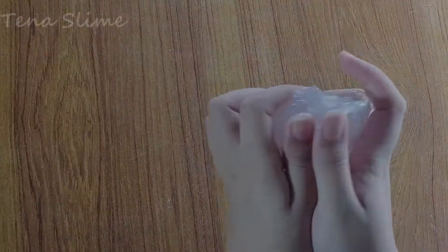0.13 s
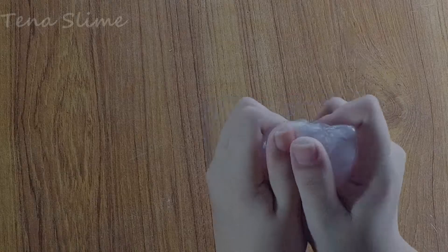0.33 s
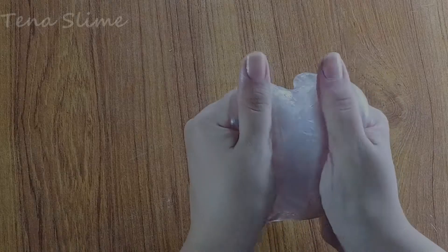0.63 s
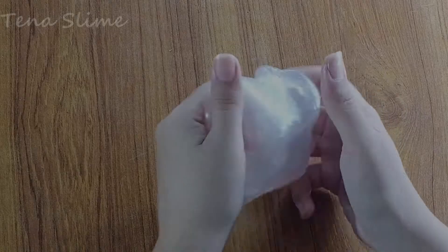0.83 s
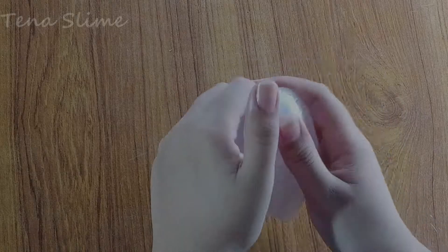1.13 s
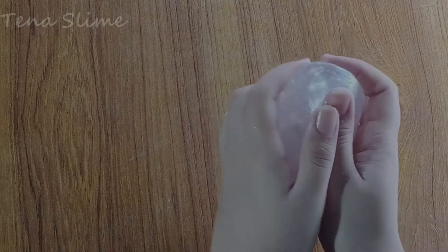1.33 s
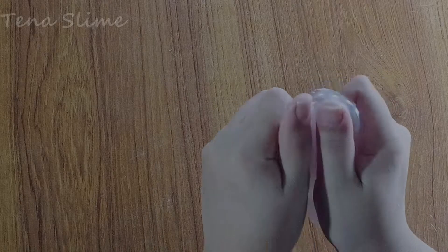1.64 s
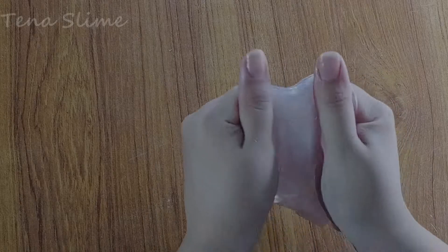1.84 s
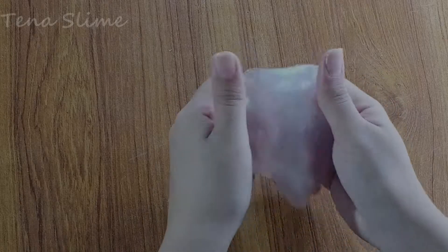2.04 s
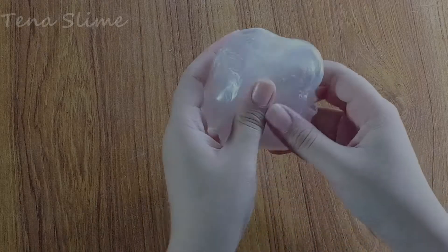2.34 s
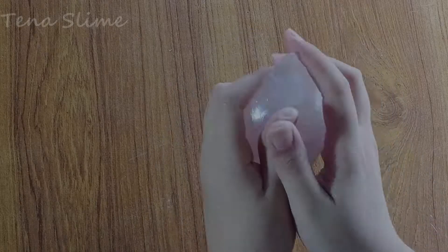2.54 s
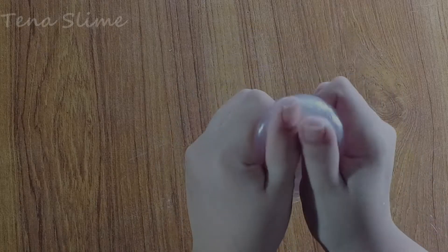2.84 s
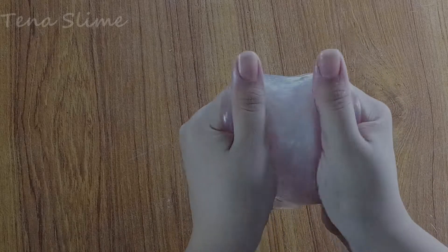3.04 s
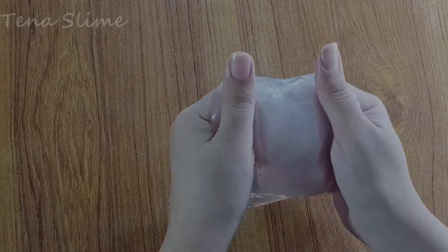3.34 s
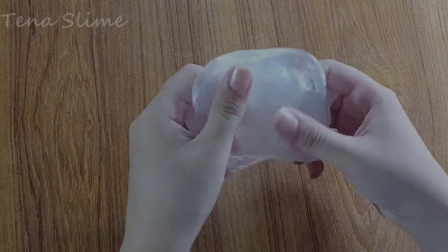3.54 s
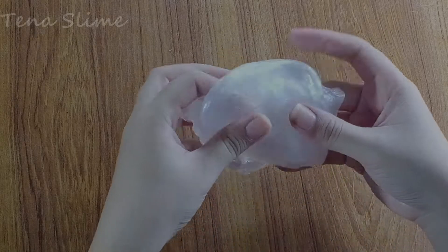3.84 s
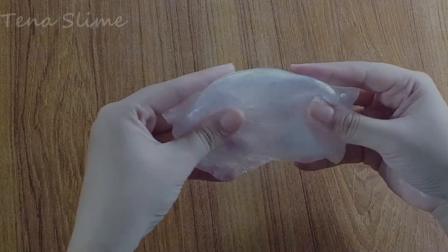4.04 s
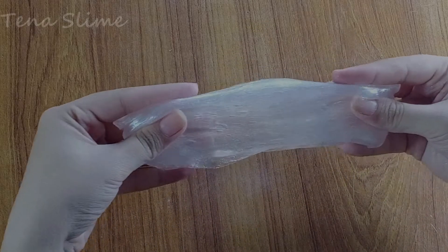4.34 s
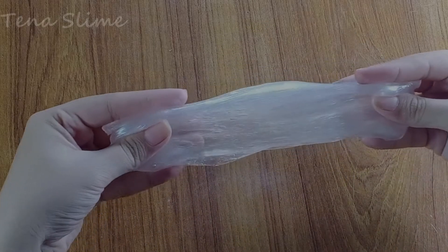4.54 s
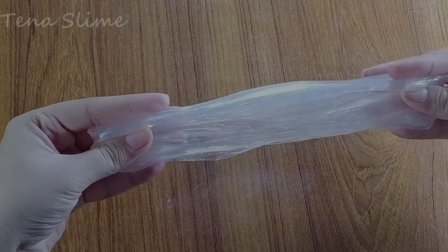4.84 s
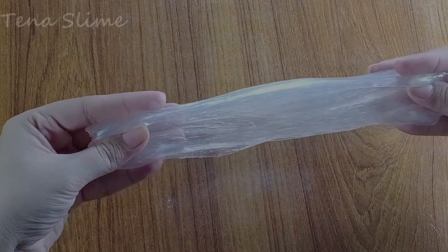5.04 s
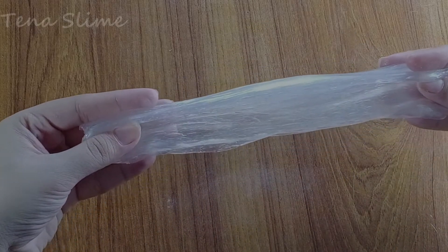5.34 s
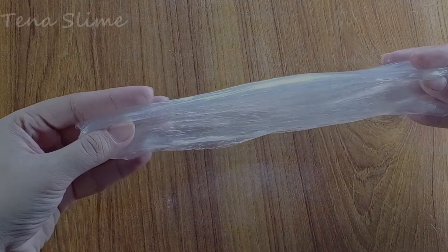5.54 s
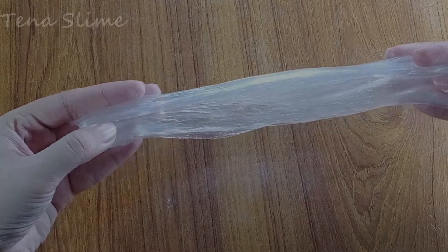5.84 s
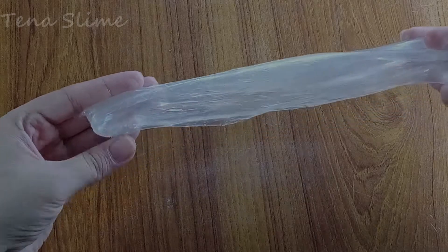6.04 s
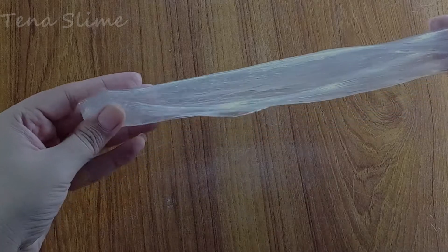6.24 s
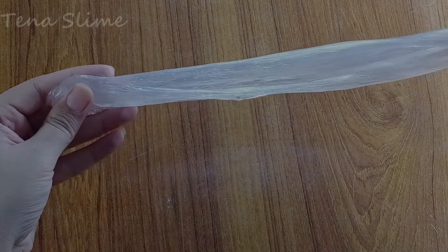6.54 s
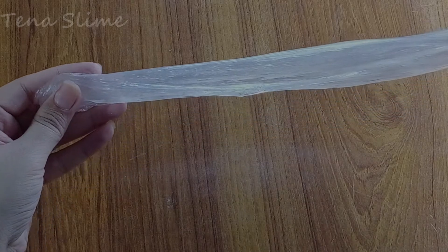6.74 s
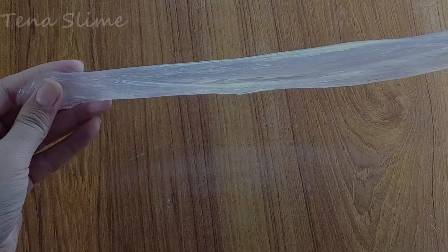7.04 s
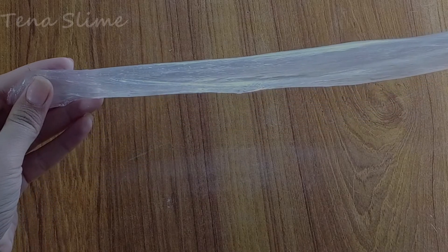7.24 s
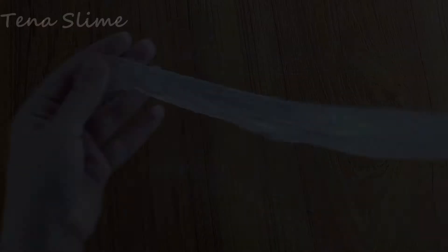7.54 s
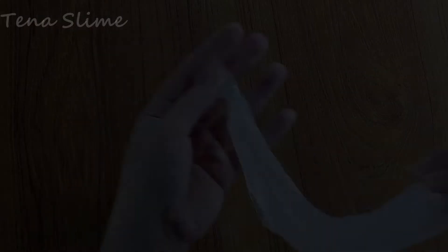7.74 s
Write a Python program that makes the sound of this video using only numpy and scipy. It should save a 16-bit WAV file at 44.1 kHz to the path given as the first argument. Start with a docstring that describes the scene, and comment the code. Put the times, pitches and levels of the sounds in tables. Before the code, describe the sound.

In a small dry room, close stereo microphones pick up slime handled over a wooden table for about eight seconds. A very faint, slightly wavering low motor hum and soft hiss run throughout. From 0 to 1.9 s come small sticky ticks and short high peeling crackles, clearest near 0.4, 0.7 and 1.6. A loud crisp snap strikes at 1.95, with a small hollow pop just after. Between 2.1 and 4.5 light clicks continue, brighter at 3.06 and 4.5. Sharp, rounder air pops land at 5.06 and 5.25, then a deep soft table thud at 5.5. Quieter ticks and peels follow around 6 to 6.4, a tight run of bright snaps at 6.7 to 6.8, peeling at 6.9, a strong pop at 7.43 and a smaller one at 7.57, then faint crackle. Each sound is brief, with only a short room echo.

```python
"""Small, dry room: two hands knead and stretch a lump of slime over a wooden table.
Trapped air pockets burst and gel peels off the skin: showers of ticks ringing cavities, with room echoes.
Pushes thud through the table: shaped noise driving decaying modes.
A motor hums somewhere in the house (wavering sines) over the hiss of two unlike microphones (noise)."""
import sys
import numpy as np
from scipy import signal
from scipy.fft import rfft, irfft
from scipy.io import wavfile

SR = 44100
rng = np.random.default_rng(int(sys.argv[2]) if len(sys.argv) > 2 else 0)


def materialize(psi):
    """Save the field psi as 16-bit PCM at rate SR to the path in sys.argv[1].

    A 1-D psi becomes a single channel; in a 2-D psi each row is a channel.
    """
    bounded = np.clip(np.atleast_2d(psi).T, -1, 1)
    quanta = np.round(bounded * 32767).astype(np.int16)
    wavfile.write(sys.argv[1], SR, quanta)


N = 347508

# Room tone and microphone hiss, spectrum shape: (frequency [Hz], relative density [dB])
FLOOR_SHAPE = [(20, -31.5), (50, -27.5), (72, -22), (100, -17.5), (150, -19), (200, -22), (300, -24),
               (400, -24), (734, -27.5), (1130, -28), (2000, -29.5), (4610, -32), (7000, -37), (9320, -36),
               (15000, -46)]
# Shared part of the floor's power: (frequency [Hz], left-right likeness [0-1])
FLOOR_LIKENESS = [(60, 0.63), (130, 0.76), (290, 0.8), (640, 0.6), (1410, 0.42), (6800, 0.16), (15000, .01)]
# Floor, left minus right: (frequency [Hz], level [dB])
FLOOR_BALANCE = [(60, 8), (700, 3), (1290, 6.5), (4400, 3), (8120, 1), (15000, -2.5)]
# Sources, left minus right microphone: (frequency [Hz], level [dB])
SOURCE_BALANCE = [(40, 6), (100, 3), (380, 4.5), (1290, 8), (2380, 4.5), (4400, 5.5), (8120, 3),
                  (10000, -11), (12000, -23.5), (15000, -7.5)]
# Motor hum and its sidebands, before swell and waver: (frequency [Hz], level [dB rms])
MOTOR_LINES = [(80, -87.5), (104.3, -69.5), (128.8, -80), (208, -87)]
# Slow swell of the hum: (time [s], gain [dB])
MOTOR_SWELL = [(0.0, -0.5), (7.88, 0.5)]
# Pushes through the table: (time [s], base level at 380 Hz [dB], extra at 200 Hz [dB],
# extra at 1 kHz [dB], push time at 380 Hz [s])
TABLE_PUSHES = [(.368, -63, 1.5, -24, 0.039), (0.585, -59, 1.5, -25, .033), (1.124, -72.5, 4, -9, 0.079),
                (1.59, -69, 0.5, -31, 0.018), (1.954, -52.5, -17, -7.5, .045), (2.186, -72, 7, -9.5, 0.045),
                (3.054, -71, -3, -17.5, 0.04), (3.428, -61, -9.5, -32, 0.025),
                (3.774, -57.5, -19.5, -28, 0.049), (4.511, -54, -12, -9.5, 0.058),
                (5.252, -53.5, -7, -37, 0.077), (5.507, -40, -4, -33, 0.048),
                (6.176, -56.5, 3.5, -37, 0.052), (6.334, -52.5, -1.5, -24, 0.051),
                (6.389, -64, -3, -24.5, .044), (6.92, -73, 5.5, -23, 0.035), (7.345, -67.5, -8, -12.5, .04),
                (7.431, -65.5, -5, 6, 0.027), (7.565, -63, -3.5, -16.5, 0.12), (7.801, -69, 11, -23, 0.06)]
# Table modes: (frequency [Hz], relative level [dB], t60 [s])
TABLE_MODES = [(75.8, -2, 0.12), (98.8, 14, 0.16), (134, -1.5, 0.114), (200.8, 3, 0.19), (256, -16, 0.045),
               (292, -7.5, 0.049), (380.6, 4, 0.076), (458.6, -1.5, 0.073), (514, -5, 0.088),
               (620, 1, 0.049), (726, -2.5, 0.099), (940, -7, 0.07), (1160, 12, 0.053)]
# Cavity decay per resonator pass at sharpness 1: (frequency [Hz], t60 [cycles])
RING_CYCLES = [(1200, 3.8), (2600, 3.65), (5500, 3.57), (9000, 7.4)]
# Early room echo decay: (frequency [Hz], t60 [s])
ECHO_T60 = [(1000, 0.11), (5000, 0.098), (12000, 0.084)]
# Gel peels off the skin: (time [s], crackle [s], film [Hz], fold level [dB], film level [dB])
SKIN_PEELS = [(0.0242, 0.019, 9100, -68, -65.5), (0.127, .019, 8650, -75, -54.5),
              (0.344, 0.041, 9200, -61, -51), (0.3651, 0.033, 8070, -50.5, -34),
              (0.623, 0.041, 8540, -61.5, -55), (0.7994, 0.026, 12400, -78, -70),
              (0.933, 0.045, 8850, -71, -57), (0.988, 0.033, 9150, -73, -60.5),
              (1.3978, 0.039, 8930, -47, -44), (1.429, .16, 7350, -69, -63), (1.539, 0.051, 8560, -75, -50),
              (1.5843, 0.035, 8730, -53, -36.5), (1.862, 0.045, 4350, -54.5, -65),
              (1.856, .035, 8400, -75, -61), (1.906, 0.078, 9100, -64, -55.5),
              (2.0773, 0.017, 8400, -53, -57), (2.1445, 0.038, 9230, -68, -47.5),
              (2.1807, 0.031, 8800, -52, -36.5), (2.182, 0.037, 6700, -53, -62),
              (2.5321, 0.027, 8600, -85.5, -53.5), (2.6276, 0.043, 8840, -51, -38.5),
              (3.037, 0.025, 8600, -53, -36.5), (3.2949, 0.013, 9150, -78, -64),
              (3.355, 0.021, 9100, -77, -58.5), (3.421, 0.027, 9000, -43, -42),
              (3.6078, 0.019, 8600, -60.5, -55), (3.68, 0.02, 9000, -65, -56.5),
              (3.7638, 0.029, 8650, -61, -46), (4.036, 0.051, 9450, -56, -39.5),
              (4.174, 0.015, 8700, -55, -50.5), (4.472, 0.028, 9300, -78, -65),
              (4.824, 0.026, 8300, -72, -60), (5.9974, 0.035, 8900, -81, -61),
              (6.04, 0.094, 7140, -76, -61.5), (6.125, 0.098, 7600, -71, -55),
              (6.155, 0.06, 8900, -44.5, -36), (6.4365, 0.031, 8030, -65.5, -56),
              (6.439, 0.023, 4490, -56.5, -68), (6.8954, 0.032, 10200, -51, -42.5),
              (6.9167, 0.015, 8200, -43, -40), (7.3, .064, 9200, -75, -70), (7.3375, 0.06, 2600, -52, -59),
              (7.563, 0.023, 8800, -38, -38), (7.8094, 0.079, 8470, -66, -63)]
# Air pockets burst: (time [s], pocket [Hz], pocket level [dB], neck level [dB], film [Hz],
# fold level [dB], film level [dB], crackle [s], sharpness [ratio])
POCKET_BURSTS = [(0.3748, 1410, -69, -71, 8700, -49.5, -32, 0.006, 1.1),
                 (0.5886, 1070, -61.5, -65, 6860, -66.5, -80, 0.0052, 1.5),
                 (0.672, 1100, -72, -67, 9100, -56, -38.5, 0.028, 0.92),
                 (0.7241, 1570, -74, -57, 8280, -38, -38.5, 0.0071, 1.5),
                 (1.612, 1190, -78, -78, 7770, -53, -70, 0.0096, 2.8),
                 (1.8816, 1150, -61, -56.5, 8600, -68, -62, .0076, 1.8),
                 (1.9532, 1020, -51, -30, 8760, -23, -15, 0.0024, 1.18),
                 (1.9779, 1172, -41, -49, 8900, -47, -37, .0045, 0.52),
                 (2.0592, 1260, -71, -83, 9100, -62, -47, .006, 1.6),
                 (2.6398, 1260, -52, -62, 8920, -35.5, -39, .012, 0.9),
                 (2.793, 1430, -77, -64.5, 8400, -78, -80, 0.024, 2.5),
                 (2.8331, 1564, -37, -67.5, 8100, -54.5, -68, 0.0083, 2.3),
                 (2.837, 1160, -77, -47.5, 8140, -64, -76, .009, 2.1),
                 (2.903, 1600, -57, -60, 7400, -68.5, -58, 0.011, 1.45),
                 (3.0584, 1800, -59.5, -64, 8520, -33, -26, 0.0037, 1.27),
                 (3.1972, 1720, -78, -52, 8500, -45.5, -41.5, 0.011, 1.4),
                 (3.431, 1130, -78, -59.5, 8300, -38, -37.5, 0.0054, 1.3),
                 (3.779, 1600, -77.5, -65, 9140, -41, -39, 0.0077, 1.3),
                 (4.3709, 1924, -60, -57.5, 7150, -68.5, -64.5, .014, 1.5),
                 (4.5078, 1130, -46.5, -51, 8600, -33, -29.5, 0.015, 0.67),
                 (4.8932, 1580, -71, -74.5, 10760, -62, -39, 0.0066, 0.95),
                 (5.007, 1540, -63.5, -64, 9540, -45, -23.5, 0.0071, 1.34),
                 (5.0627, 1460, -28, -52, 8740, -40.5, -32.5, 0.013, 0.8),
                 (5.2517, 1090, -26, -26, 8620, -28, -21, 0.012, 0.97),
                 (5.2554, 1355, -39, -27.5, 6260, -29.5, -34, 0.0071, 1.33),
                 (5.5111, 960, -40.5, -51, 8580, -51.5, -49, 0.0082, 1.24),
                 (5.6443, 1380, -85.5, -79.5, 9370, -50.5, -34.5, 0.005, 0.79),
                 (5.91, 1190, -83.5, -72, 9250, -50, -39, 0.0068, 1.35),
                 (5.973, 986, -43.5, -45.5, 7900, -64, -65, .0091, 1.1),
                 (6.1591, 1290, -83, -74, 8660, -37, -46, 0.01, 1.5),
                 (6.34, 1010, -58.5, -57.5, 8500, -54, -59, 0.0079, 1.65),
                 (6.6905, 1550, -50, -55, 7830, -25, -19, .0036, 0.99),
                 (6.7462, 1600, -44, -40, 9350, -42, -37.5, 0.0092, 1.4),
                 (6.7631, 1530, -36.5, -33.5, 8900, -25.5, -23, 0.0053, 0.6),
                 (6.7811, 1680, -73, -70, 8500, -63, -28.5, .0031, .9),
                 (6.93, 1800, -73, -69.5, 8920, -40, -29, 0.0081, 0.91),
                 (7.3618, 1930, -48.5, -40, 8040, -57, -47.5, 0.0049, 0.97),
                 (7.428, 1635, -31.5, -30, 7960, -20, -28.5, 0.0071, 1.05),
                 (7.574, 1110, -62, -41, 8000, -28, -36, 0.0058, 0.76)]

FLOOR_RMS_DB = -71
MOTOR_WAVER_DB, MOTOR_WAVER_KNOTS_PER_S = 2.2, 13.0
THUD_BASS_DB = -14   # 100 Hz against 200 Hz
ECHO_DB, ECHO_BUILD_S = -22.5, 0.0059   # wall echoes need time to arrive
LATE_ECHO_DB, LATE_ECHO_T60_RATIO = -17, 1.9   # weaker, slower tail from farther walls
TABLE_ECHO_S, TABLE_ECHO_DB = 0.0036, -5
CLUMP_DB, CLUMP_SAMPLES = 4.0, 256   # ticks clump in about 6 ms
FILM_OVERTONE_RATIO, FILM_OVERTONE_DB = 1.3, -12.5   # thinnest film sings above its main resonance
NECK_RATIO, FOLD_RATIO = 1.984, 0.62   # neck rings above its pocket, fold below its film
PEEL_TICKS_PER_S, PEEL_SPREAD_DB = 2100, 5   # spread: dB per unit of random tick size
PEEL_LEAD_S = 0.003   # a peel starts below hearing
PEEL_BODY_HZ, PEEL_BODY_DB = 2240, -14   # lump, level against the fold
PEEL_SHARPER_PER_DB, PEEL_PLAIN_DB = 0.022, -38   # fainter than the plain level rings longer
FAINT_COUNT, FAINT_DB, FAINT_CRACKLE_S, FAINT_FILM_HZ = 12, -67, 0.03, 8600
POP_TICKS_PER_S, POP_SPREAD_DB = 470, -1
TEAR_S = 0.0016   # a film tears this long before its pocket bursts
CUTOFF_HZ = 16400


def from_db(db):
    """Decibels to gain."""
    return 10 ** (np.asarray(db) / 20)


def at_hz(points, hz):
    """Reads a table on a log-frequency axis."""
    table_hz, values = np.array(points).T
    return np.interp(np.log(np.maximum(hz, 1)), np.log(table_hz), values)


def drift(knots_per_s):
    """Slow random curve of spread 1: noise knots joined by lines."""
    knots = rng.standard_normal(400)
    curve = np.interp(np.arange(N) / SR * knots_per_s, np.arange(400), knots)
    return curve * np.sqrt(3 / 2)   # restores the spread lost between knots


def resonate(x, hz, t60_s):
    """One decaying mode: a two-pole resonator with zeros at DC and Nyquist."""
    radius = from_db(-60 / (t60_s * SR))
    angle = 2 * np.pi * hz / SR
    return signal.lfilter([1, 0, -1], [1, -2 * radius * np.cos(angle), radius * radius], x)


def add(out, time_s, sound):
    """Mixes a sound in at a time."""
    start = max(round(time_s * SR), 0)
    out[start:start + len(sound)] += sound[:N - start]


def both_mics(x, balance):
    """Splits a sound between the microphones by frequency, keeping their mean."""
    ratio = from_db(at_hz(balance, np.arange(N // 2 + 1) * SR / N))
    gains = 2 * np.array([ratio, np.ones_like(ratio)]) / (1 + ratio)
    return irfft(rfft(x) * gains, N)


def floor():
    """Smooth room tone and hiss: shared and separate noise, most alike in the bass and low mids."""
    hz = np.arange(N // 2 + 1) * SR / N
    shared, left, right = rfft(rng.standard_normal((3, N)))
    alike = np.clip(at_hz(FLOOR_LIKENESS, hz), 0, 1)
    spectra = np.sqrt(alike) * shared + np.sqrt(1 - alike) * np.array([left, right])
    tilt_db = at_hz(FLOOR_BALANCE, hz) / 2 * [[1], [-1]]
    noise = irfft(spectra * from_db(at_hz(FLOOR_SHAPE, hz) + tilt_db), N)
    return from_db(FLOOR_RMS_DB) * noise / noise.std()


def motor():
    """Steady hum lines whose levels waver separately and swell together."""
    t = np.arange(N) / SR
    hum = np.zeros(N)
    for hz, rms_db in MOTOR_LINES:
        gain = from_db(rms_db + MOTOR_WAVER_DB * drift(MOTOR_WAVER_KNOTS_PER_S))
        hum += gain * np.sin(2 * np.pi * (hz * t + rng.random()))
    swell_s, swell_db = np.transpose(MOTOR_SWELL)
    return np.sqrt(2) * from_db(np.interp(t, swell_s, swell_db)) * hum   # rms to peak


def thuds():
    """A soft uneven push shakes the table modes; the low ones build up later."""
    out, t = np.zeros(N), np.arange(SR // 2) / SR
    for time_s, level_db, db_200, db_1k, push_s in TABLE_PUSHES:
        force = rng.standard_normal(len(t))
        colour = np.transpose([[100, 200, 380, 1000], [db_200 + THUD_BASS_DB, db_200, 0, db_1k]])
        for hz, mode_db, t60_s in TABLE_MODES:
            # the push softens as it spreads, so the thud sinks in pitch
            length_s = push_s * (380 / hz) ** 0.17
            push = force * np.sin(np.pi * np.clip(t / length_s, 0, 1) ** 0.54)
            soft_push = resonate(push, hz, 3.35 / hz)   # the gel passes no sharp edges
            ring = resonate(soft_push, hz, t60_s)
            peak_db = level_db + mode_db + at_hz(colour, hz)
            add(out, time_s, from_db(peak_db) * ring / np.abs(ring).max())
    return out


def tick_shower(t, length_s, ticks_per_s, spread_db, sudden):
    """Random clumped ticks swell and fade; a burst adds a small tear tick and one big tick."""
    born = rng.random(len(t)) < ticks_per_s / SR
    size = np.minimum(rng.exponential(1, len(t)), 3)
    sign = np.sign(rng.standard_normal(len(t)))
    ticks = born * from_db(spread_db * (size + 2)) * sign
    clumps = np.repeat(rng.standard_normal(len(t) // CLUMP_SAMPLES + 1), CLUMP_SAMPLES)[:len(t)]
    ticks *= from_db(CLUMP_DB * clumps.clip(-2, 1))
    done = t / length_s
    ticks *= np.clip(2 * (1 - done), 0, 1) * np.clip(6 * done, 0, 1)
    ticks[[0, round(TEAR_S * SR)]] += sudden * np.array([0.15, 1])
    return ticks


def room_response(t, hz, echo_noise):
    """Direct sound, one table echo and decaying wall echoes at the given pitch."""
    fall_db = -60 * t / at_hz(ECHO_T60, hz)
    tail = from_db(fall_db) + from_db(LATE_ECHO_DB + fall_db / LATE_ECHO_T60_RATIO)
    room = from_db(ECHO_DB) * tail * echo_noise * np.clip(t / ECHO_BUILD_S, 0, 1)
    room[0] = 1
    room[round(TABLE_ECHO_S * SR)] = from_db(TABLE_ECHO_DB)
    return room


def crackles(events, ticks_per_s, spread_db, sudden):
    """Each tick shower rings the cavities of the gel and echoes round the room."""
    out, t = np.zeros(N), np.arange(SR // 4) / SR
    for time_s, length_s, sharpness, cavities in events:
        ticks = tick_shower(t, length_s, ticks_per_s, spread_db, sudden)
        echo_noise = rng.standard_normal(len(t))
        start_s = time_s if sudden else time_s - PEEL_LEAD_S
        film_hz, film_db = cavities[-1]
        overtone = (FILM_OVERTONE_RATIO * film_hz, FILM_OVERTONE_DB + film_db)
        for hz, peak_db in cavities + [overtone]:
            ring = signal.fftconvolve(ticks, room_response(t, hz, echo_noise))[:len(t)]
            for _ in range(3):   # steep flanks on both sides
                ring = resonate(ring, hz, sharpness * at_hz(RING_CYCLES, hz) / hz)
            add(out, start_s, from_db(peak_db) * ring / (np.abs(ring).max() + 1e-18))
    return out


def peels():
    """Each peel rings lump, fold and film; faint ones, random in time, pitch and level, only their film."""
    layers = []
    for time_s, length_s, film_hz, fold_db, film_db in SKIN_PEELS:
        lump = (PEEL_BODY_HZ, fold_db + PEEL_BODY_DB)
        layers.append((time_s, length_s, [lump, (FOLD_RATIO * film_hz, fold_db), (film_hz, film_db)]))
    for when, pitch, size in rng.random((FAINT_COUNT, 3)):
        film = (FAINT_FILM_HZ * (1 + 0.2 * (pitch - 0.5)), FAINT_DB + 6 * (size - 0.5))
        layers.append((when * N / SR, FAINT_CRACKLE_S, [film]))
    events = []
    for time_s, length_s, cavities in layers:
        loudest_db = max(level_db for _, level_db in cavities)
        sharpness = np.exp(PEEL_SHARPER_PER_DB * (PEEL_PLAIN_DB - loudest_db))
        events.append((time_s, length_s, sharpness, cavities))
    return crackles(events, PEEL_TICKS_PER_S, PEEL_SPREAD_DB, sudden=False)


def pops():
    """Each bursting air pocket rings pocket, neck, fold and film."""
    events = []
    for (time_s, pocket_hz, pocket_db, neck_db, film_hz,
         fold_db, film_db, length_s, sharpness) in POCKET_BURSTS:
        cavities = [(pocket_hz, pocket_db), (NECK_RATIO * pocket_hz, neck_db),
                    (FOLD_RATIO * film_hz, fold_db), (film_hz, film_db)]
        events.append((time_s, length_s, sharpness, cavities))
    return crackles(events, POP_TICKS_PER_S, POP_SPREAD_DB, sudden=True)


def scene():
    """Motor, table and slime reach both microphones over the floor."""
    sources = motor() + thuds() + peels() + pops()
    return floor() + both_mics(sources, SOURCE_BALANCE)


def record(dry):
    """Steep low-pass cuts the top."""
    low_pass = signal.cheby2(12, 70, CUTOFF_HZ, fs=SR, output="sos")   # 70 dB down from the cutoff up
    return signal.sosfilt(low_pass, dry)


dry = scene()
out = record(dry)
materialize(out)
```